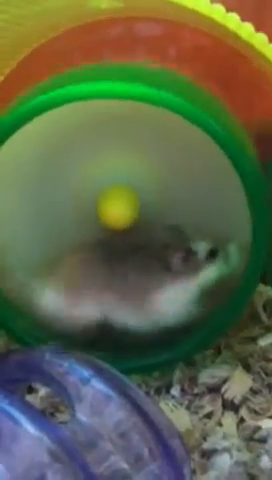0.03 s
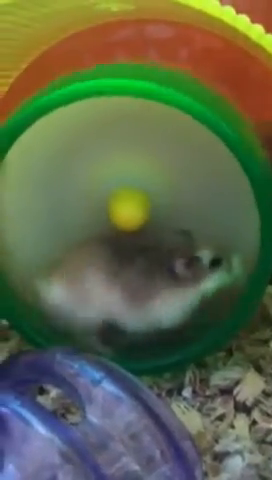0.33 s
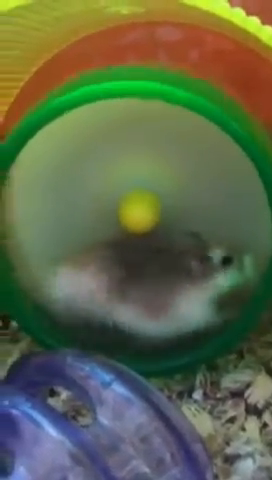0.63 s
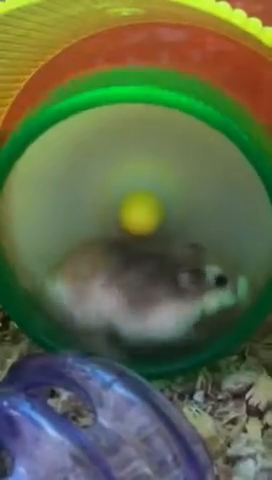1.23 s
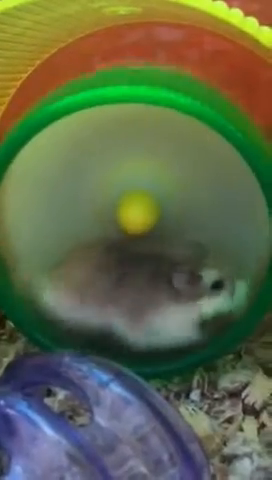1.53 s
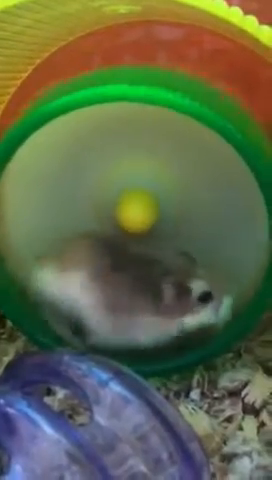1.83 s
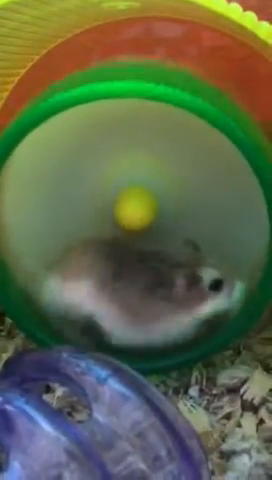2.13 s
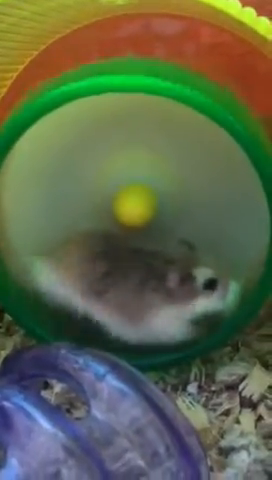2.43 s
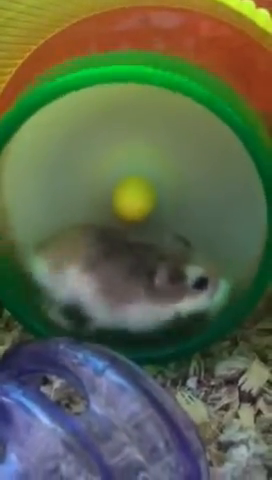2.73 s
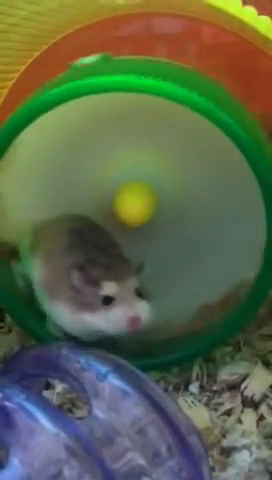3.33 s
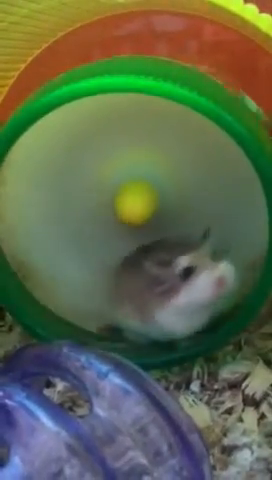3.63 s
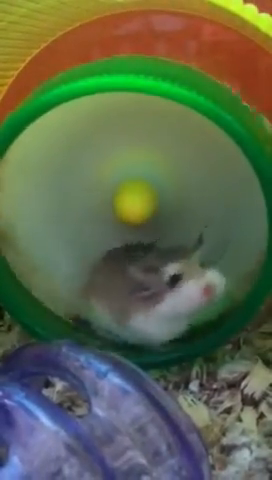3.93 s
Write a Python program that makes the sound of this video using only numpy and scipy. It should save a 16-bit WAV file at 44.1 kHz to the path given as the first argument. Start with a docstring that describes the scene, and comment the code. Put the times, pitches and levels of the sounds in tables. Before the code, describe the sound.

A plastic wheel rumbles and whirrs close by as a hamster runs in it, with pattering claws, short scrapes and occasional light knocks. After about three seconds it stops, leaving a few faint ticks in a quiet room.

```python
"""A plastic wheel rumbles and whirrs as a hamster runs in it, close by, and stops after three seconds.
Small rolling bumps keep the drum's resonances ringing, and rubbing swells its hollow note. Heavy steps
set it swinging; now and then it knocks on its axle and the hub clicks. Claws excite the track's high
resonances, in an even patter at first, then slipping in short scrapes. At the end a few faint ticks
and the hum of the quiet room are left."""
import sys
import numpy as np
from scipy import signal
from scipy.fft import rfft, irfft
from scipy.io import wavfile
from scipy.ndimage import uniform_filter1d

SR = 44100
rng = np.random.default_rng(int(sys.argv[2]) if len(sys.argv) > 2 else 0)


def int16_out(signal):
    """Quantize to a 16-bit WAV file."""
    q = np.round(np.clip(np.atleast_2d(signal).T, -1, 1) * 32767)
    wavfile.write(sys.argv[1], SR, q.astype(np.int16))


N = 176400

# broad frequency response of the running track (frequency [Hz], gain [dB])
TRACK_RESPONSE = [(500,-10),(2000,-24),(3200,-5),(4500,2),(6500,1),(9000,2.5),(12000,-3),(14000,-11),(15500,-21)]
# narrow resonances of the track (frequency [Hz], bandwidth [Hz], lift [dB])
TRACK_RESONANCES = [(3715,150,13.5),(4130,110,9),(4380,27,13.5),(4740,156,12.5),(5620,150,4),(5900,27,12),(6950,120,6.5)]
CLAW_MID_DB = -65  # taps and scrapes listed above this level are brighter, those below it duller


def amp(db):
    """Amplitude ratio: a factor of ten for every 20 dB."""
    return 10 ** (np.asarray(db) / 20)


def unit(x):
    """Normalisation to rms 1."""
    return x / np.sqrt(np.mean(x ** 2) + 1e-20)


def add(mix, s, sound):
    """Superposition: a sound joins the mix at s seconds."""
    part = mix[max(round(s * SR), 0):][:len(sound)]
    part += sound[:len(part)]


def envelope(points):
    """Amplitude envelope interpolated from (time [s], level [dB]) points."""
    return amp(np.interp(np.arange(N) / SR, *np.transpose(points)))


def highpass(x, hz):
    """A second-order high-pass: 12 dB less per octave below the corner."""
    return signal.sosfilt(signal.butter(2, hz, "high", fs=SR, output="sos"), x)


def resonate(x, response, peaks=(), tilt_db=0, size=8192):
    """A body as a minimum-phase filter of unit energy; tilt is per octave above the first track mode."""
    hz = abs(np.fft.fftfreq(size, 1 / SR)) + 1
    point_hz, point_db = np.transpose(response)
    db = np.interp(np.log(hz), np.log(point_hz), point_db)
    db += tilt_db * np.log2(np.maximum(hz / TRACK_RESONANCES[0][0], 1))
    for centre, width, lift in peaks:
        db += lift / (1 + (2 * (hz - centre) / width) ** 2)
    spectrum = np.exp(np.conj(signal.hilbert(np.log(amp(db)))))
    ring = np.fft.ifft(spectrum).real[:size // 2]
    return signal.fftconvolve(x, ring / np.linalg.norm(ring))[:len(x)]


def grains(n, per_s, spread_db):
    """Shot noise: tiny random impacts of uneven size over a faint hiss, rms 1."""
    size = amp(spread_db * np.minimum(rng.exponential(1, n), 4))
    impacts = size * rng.choice([-1, 1], n) * (rng.random(n) < per_s / SR)
    return unit(impacts + rng.standard_normal(n) / 20)


def wander(bandwidth_hz):
    """Low-passed noise: a smooth random fluctuation, rms 1."""
    hz = np.fft.rfftfreq(N, 1 / SR)
    return unit(irfft(rfft(rng.standard_normal(N)) * np.exp(-(hz / bandwidth_hz) ** 2), N))


def spot_colour(x, depth_db, bands=70):
    """Response depends on the point of contact: each spot of the track has its own spectral ripple."""
    spectrum = rfft(x)
    position = np.linspace(0, bands - 1, len(spectrum))
    ripple = np.interp(position, np.arange(bands), rng.standard_normal(bands))
    return irfft(spectrum * amp(depth_db * ripple), len(x))


def ring_track(force, tilt_db):
    """Resonance of the track: each paw lands elsewhere and shifts the peaks by about one percent."""
    peaks = [(hz * (1 + .012 * rng.normal()), width, lift) for hz, width, lift in TRACK_RESONANCES]
    return resonate(force, TRACK_RESPONSE, peaks, tilt_db, size=2048)


def strikes(events, modes, scatter, chatter, chatter_s, dulling=0):
    """Modal ringing: chattering blows excite damped modes; with dulling, soft blows lose treble."""
    out, t = np.zeros(N), np.arange(SR // 8) / SR
    hard_db, treble_hz = -44, 872
    for s, db in events:
        tilt_db = dulling * min(db - hard_db, 0)  # per octave above treble_hz
        ring = np.zeros(len(t))
        for hz, mode_db, t60 in modes:
            decay = amp(mode_db + tilt_db * max(np.log2(hz / treble_hz), 0) - 60 * t / t60)
            detuned_hz = hz * (1 + scatter * rng.normal())
            ring += decay * np.sin(2 * np.pi * detuned_hz * t) * rng.choice([-1, 1])
        force = (t == 0) + chatter * rng.standard_normal(len(t)) * np.exp(-t / chatter_s)
        blow = signal.fftconvolve(ring, force)[:len(t)]
        rms = np.sqrt(np.sum(blow ** 2) / (SR / 100))  # as if all its energy fell in 10 ms
        add(out, s, amp(db) * blow / rms)
    return out


def room():
    """Stationary filtered noise: the room's low hum and faint hiss."""
    # spectrum of the room noise (frequency [Hz], gain [dB])
    hum_spectrum = [(30,-46),(75,-29.5),(100,-13),(135,-9),(190,-6),(235,1),(300,-6),(390,-15),(520,-12),(600,-12.5),(700,-35),(900,-23.5),(1500,-23),(4500,-33.5),(12000,-42),(15000,-56)]
    return amp(-60) * unit(resonate(rng.standard_normal(N + SR), hum_spectrum)[SR:])


def grit():
    """Dense micro-impacts: fine grit under the feet excites the track with a flickering hiss."""
    # envelope of the grit (time [s], level [dB])
    grit_levels = [(0,-71.5),(.6,-72.5),(1.1,-73),(1.9,-73.5),(2.3,-76.5),(2.75,-76.5),(3.05,-81),(3.4,-88)]
    force = grains(N, per_s=6000, spread_db=3.2) * envelope(grit_levels)
    flicker = amp(3 * wander(bandwidth_hz=70))
    return resonate(force * flicker, TRACK_RESPONSE, TRACK_RESONANCES[:2], tilt_db=-5)


def scrapes():
    """Stick-slip friction: sliding claws catch and chatter; light slips are duller."""
    # claw slips, each at its midpoint (time [s], level [dB] before gain_db)
    slips = [(.887,-65.5),(.955,-64),(1.212,-62.5),(1.314,-60),(1.499,-62),(1.671,-62.5),(1.782,-64),(1.873,-61),(2.118,-61.5),(2.23,-62.5),(2.348,-66),(2.475,-60.5),(2.608,-59.5),(2.745,-61),(2.869,-65),(2.935,-63),(3.645,-74)]
    gain_db, length_s = -1.2, .042
    out, n = np.zeros(N), round(length_s * SR)
    swell = np.sin(np.pi * np.arange(n) / n)
    for s, db in slips:
        catch = amp(3.5 * unit(uniform_filter1d(rng.standard_normal(n), 150)))
        chatter = unit(spot_colour(catch * grains(n, per_s=5400, spread_db=3.8), depth_db=2))
        force = np.pad(amp(db + gain_db) * swell * chatter, (0, SR // 50))
        add(out, s - length_s / 2, ring_track(force, tilt_db=-5.5 + .12 * (db - CLAW_MID_DB)))
    return out


def claws():
    """Impact excitation: each tap is a tight cluster of clicks on the track; harder taps are brighter."""
    # claw taps (time [s], level [dB] before gain_db)
    taps = [(0.045,-65),(.092,-70),(0.136,-72),(0.182,-76),(0.225,-68),(0.266,-62),(.280,-67),(.314,-66),(0.35,-63),(0.367,-67.5),(.393,-67),(.412,-64),(.433,-64),(0.49,-60),(.514,-66),(.531,-67),(0.558,-64),(0.6,-66.5),(.646,-63),(.687,-61),(0.705,-64),(0.746,-65),(.770,-68),(.794,-62.5),(0.83,-64),(0.882,-67),(0.921,-67),(.947,-64),(0.978,-68),(1.007,-62.5),(1.036,-65),(1.065,-68),(1.097,-64.5),(1.123,-68),(1.178,-64),(1.195,-63),(1.212,-63),(1.226,-63),(1.268,-65),(1.369,-67.5),(1.397,-62.5),(1.46,-64),(1.485,-63),(1.585,-60),(1.592,-54.5),(1.633,-64),(1.744,-66),(1.782,-60),(1.848,-58),(1.874,-61),(1.935,-65),(2.042,-67.5),(2.112,-59),(2.143,-66.5),(2.226,-58.5),(2.471,-58),(2.479,-59),(2.507,-69),(2.904,-62.5),(3.196,-69),(3.455,-72.5)]
    gain_db, rise_s, t60_s = 3, .0012, .02
    tail_db, tail_t60_s = -19, .045
    out, t = np.zeros(N), np.arange(SR // 10) / SR
    decay = amp(-60 * t / t60_s) + amp(tail_db - 60 * t / tail_t60_s)
    shape = (1 - np.exp(-t / rise_s)) * decay
    for s, db in taps:
        cluster = unit(spot_colour(grains(len(t), per_s=12000, spread_db=3.4), depth_db=3.8))
        force = amp(db + gain_db) * shape / shape.max() * cluster
        add(out, s, ring_track(force, tilt_db=-.8 + .1 * (db - CLAW_MID_DB)))
    return out


def hub_clicks():
    """Free vibration: sharp blows ring the hub's high, quickly damped modes."""
    # blows on the hub (time [s], level [dB] before the output gain)
    clicks = [(.392,-57.5),(.690,-63),(.917,-62.5),(.984,-57.5),(1.128,-63),(1.160,-59.5),(1.773,-59.5),(1.852,-60.5),(1.917,-55.5),(2.194,-63),(2.385,-70),(2.644,-62),(2.655,-61),(2.684,-61.5)]
    # modes of the hub (frequency [Hz], gain [dB], T60 [s])
    hub_modes = [(3775,17,.026),(4110,15,.018),(4520,12,.018)]
    return amp(-1) * strikes(clicks, hub_modes, scatter=.015, chatter=1, chatter_s=.0038)


def axle_knocks():
    """Free vibration: the drum knocks on its axle; softer blows reach its high modes less."""
    # blows against the axle (time [s], level [dB] before the output gain)
    knocks = [(.393,-52),(.956,-53),(1.160,-50),(1.772,-49),(1.779,-48),(1.799,-52),(1.917,-52),(1.942,-52.5),(1.977,-53.5),(2.197,-53),(2.384,-51.5),(2.654,-44),(2.686,-53.5),(2.779,-53)]
    # modes of the drum (frequency [Hz], gain [dB], T60 [s])
    drum_modes = [(405,-12,.018),(622,-9,.035),(750,-7,.013),(902,6,.017),(1036,-7,.04),(1199,-3,.028),(1370,-9,.018),(1976,-9,.022),(2309,-8,.022),(2870,-19,.018)]
    return amp(3.5) * strikes(knocks, drum_modes, scatter=.014, chatter=.12, chatter_s=.006, dulling=1)


def footfalls():
    """Damped oscillation: a heavy step pushes the drum into a few low, inharmonic swings."""
    # heavy steps (time [s], level [dB] before gain_db, frequency [Hz])
    steps = [(0.398,-46,330),(0.432,-43.5,331),(0.738,-46.5,292),(.861,-49.5,322),(1.156,-40,260),(1.376,-48.5,370),(1.489,-50,314),(1.594,-43,377),(1.798,-46,319),(1.942,-43,334),(1.973,-45.5,330),(2.027,-48.5,300),(2.087,-48,298),(2.236,-50.5,303),(2.406,-44.5,347),(2.434,-48,306),(2.554,-49.5,278),(2.655,-46,253),(2.784,-46,250)]
    gain_db, rise_s, t60_s = 2.5, .0059, .052
    out, t = np.zeros(N), np.arange(SR // 8) / SR
    shape = (1 - np.exp(-t / rise_s)) * amp(-60 * t / t60_s)
    for s, db, hz in steps:
        swing = np.sin(2 * np.pi * hz * t)
        for ratio, gain in (.77, .41), (1.386, .54):
            swing += gain * np.sin(2 * np.pi * (hz * ratio * t + rng.random()))
        add(out, s, amp(db + gain_db) * swing * shape / shape.max())
    return highpass(out, 108)


def rubs():
    """Friction: where the drum rubs harder, its hollow note swells briefly."""
    # rubs, each at its peak (time [s], level [dB], frequency [Hz])
    rub_peaks = [(.101,-44.5,875),(.161,-45,857),(.255,-47,835),(.457,-46.5,917),(.508,-47,871),(.585,-44,886),(.629,-47,918),(.702,-45.5,867),(.76,-47,811),(.788,-45,875),(.832,-43.5,844),(.906,-46.5,845),(1.143,-50.5,898),(1.201,-46,874),(1.38,-46.5,908),(1.891,-49.5,872),(2.144,-51.5,853),(2.783,-48.5,783),(2.875,-58.5,899),(2.995,-57.5,879)]
    sigma_s = .009
    out, t = np.zeros(N), np.arange(SR // 10) / SR
    swell = np.exp(-.5 * ((t - t.mean()) / sigma_s) ** 2)
    for s, db, hz in rub_peaks:
        note = np.sqrt(2) * np.sin(2 * np.pi * (hz * t + rng.random()))
        add(out, s - t.mean(), amp(db) * swell * note)
    return out


def rolling():
    """Forced vibration: small random bumps of the turning wheel keep its resonances ringing."""
    # the drum's low resonances (frequency [Hz], gain [dB])
    rumble_response = [(30,-48),(70,-36.5),(92,-16),(115,-13),(190,-8.5),(245,-3),(310,-0.5),(365,-5),(402,-0.5),(450,-7.5),(490,-6.5),(560,-14),(700,-18),(1100,-53.5)]
    # envelope of the rumble (time [s], level [dB])
    rumble_levels = [(0,-52),(.6,-50.5),(1.4,-50.5),(2.0,-51),(2.2,-55),(2.45,-52),(2.8,-52.5),(3.1,-63),(3.3,-69.5),(3.9,-75.5)]
    # the drum's midrange resonances (frequency [Hz], gain [dB])
    whirr_response = [(300,-46.5),(580,-21.5),(635,-5),(685,-13.5),(750,-2.5),(865,1.5),(960,-6.5),(1050,-7),(1110,-21),(1148,-12.5),(1230,-23.5),(1320,-20),(1500,-45),(1930,-26),(2320,-32.5),(3000,-38.5),(6000,-68)]
    # envelope of the whirr (time [s], level [dB])
    whirr_levels = [(0,-51.5),(.75,-49.5),(1.05,-51),(1.85,-51.5),(2.1,-55),(2.7,-54.5),(2.99,-62),(3.08,-70),(3.3,-74.5)]
    rumble = unit(resonate(grains(N, per_s=500, spread_db=2), rumble_response))
    whirr = unit(resonate(grains(N, per_s=900, spread_db=1.8), whirr_response))
    return rumble * envelope(rumble_levels) + whirr * envelope(whirr_levels)


def scene():
    """Superposition: wheel, feet and room add in one channel."""
    wheel = rolling() + highpass(axle_knocks() + hub_clicks(), 330) + rubs()
    feet = footfalls() + claws() + grit() + scrapes()
    return (wheel + feet + room())[None]


def record(dry):
    """Band limiting: a linear-phase low-pass removes the highest treble."""
    cutoff_hz = 15400
    lowpass = signal.firwin(511, cutoff_hz, window=("kaiser", 9), fs=SR)
    return signal.oaconvolve(dry, lowpass[None], "same")


dry = scene()
out = record(dry)
int16_out(out)
```